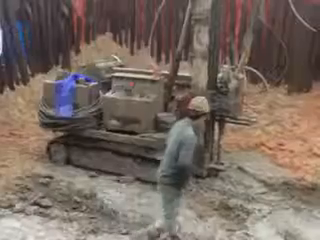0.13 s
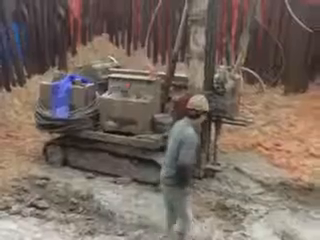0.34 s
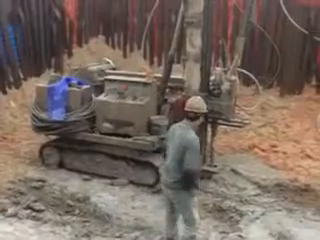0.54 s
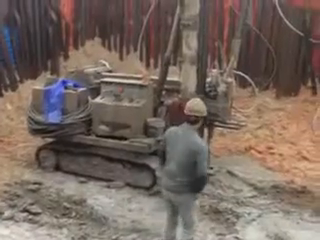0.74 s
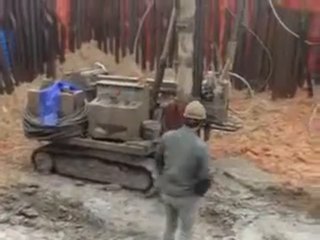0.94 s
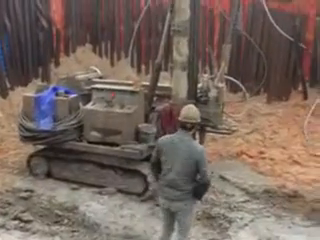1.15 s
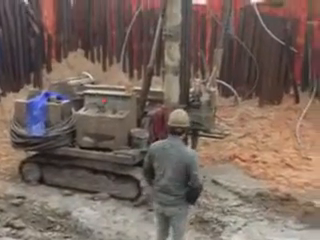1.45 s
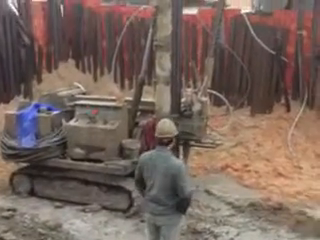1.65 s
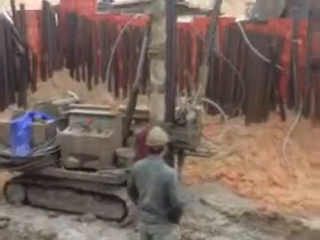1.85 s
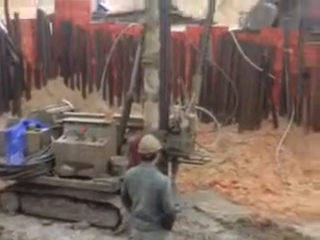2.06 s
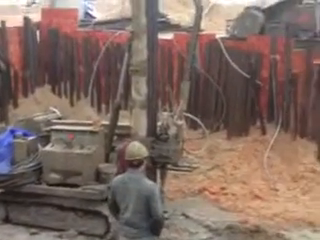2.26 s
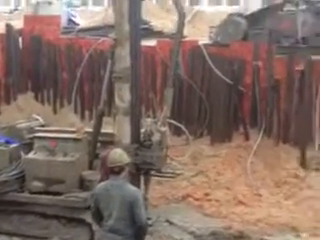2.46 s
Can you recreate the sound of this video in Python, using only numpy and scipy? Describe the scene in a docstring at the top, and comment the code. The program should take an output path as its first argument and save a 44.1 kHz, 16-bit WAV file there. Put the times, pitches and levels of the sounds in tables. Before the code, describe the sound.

After a brief instant of silence, loud drilling rig noise starts abruptly and holds level to the end: rough midrange roar, ringing panels, whining gears, pump tones and chattering metal, in mono with no extreme treble.

```python
"""Drilling rig in a piled pit

A tracked drilling rig runs steadily in a pit lined with steel piles, picked up by one small mono microphone.
Engine, cooling air and hydraulics make a dense roar of coloured noise, and noise rings in panels and pipes.
A gear mesh whines with shaft sidebands, a pump adds a thin series of tones and a low hum throbs.
Behind them loose metal rattles as short rings at random moments, and a few faint steady tones hold on."""
import sys
import numpy as np
from scipy import signal
from scipy.fft import rfft, irfft, next_fast_len
from scipy.io import wavfile
from scipy.ndimage import uniform_filter1d

SR = 44100
rng = np.random.default_rng(int(sys.argv[2]) if len(sys.argv) > 2 else 0)


def transcribe(signal):
    """Save signal, clipped to [-1, 1], as a 16-bit WAV file at the path in sys.argv[1]."""
    frames = np.atleast_2d(signal).T
    limited = np.clip(frames, -1, 1)
    pcm = np.round(limited * 32767).astype(np.int16)
    wavfile.write(sys.argv[1], SR, pcm)


N = 115542
TIME = np.arange(N) / SR


def amp(db):
    """Decibels to gain."""
    return 10 ** (np.asarray(db) / 20)


def rms_one(x):
    """Scale to rms 1."""
    return x / np.sqrt(np.mean(x ** 2) + 1e-20)


def in_time(rows):
    """Columns of a table, after its first in seconds, as curves in time."""
    s, *columns = np.transpose(rows)
    return [np.interp(TIME, s, c) for c in columns]


def drift(rate_hz):
    """Slow random wandering of spread 1: noise low-passed twice near rate_hz."""
    step = 40   # samples between computed points
    r = np.exp(-2 * np.pi * rate_hz * step / SR)
    settle = 2000   # points dropped while the filter settles
    noise = rng.standard_normal(N // step + 2 + settle)
    slow = signal.lfilter([1], [1, -2 * r, r * r], noise)[settle:]
    return np.interp(np.arange(N) / step, np.arange(len(slow)), rms_one(slow))


def tone(hz, level_db, waver=1):
    """A sine whose pitch and rms level waver a little about the given values."""
    pitch_hz = hz + waver * 0.68 * drift(4.3)
    phase = 2 * np.pi * (np.cumsum(pitch_hz) / SR + rng.random())
    wavering_db = level_db + waver * 1.0 * drift(4)
    return np.sqrt(2) * amp(wavering_db) * np.sin(phase)


def ringing(hz, width_hz):
    """Noise through the same two-pole resonance twice, for dark valleys beside the peak; rms 1."""
    r = np.exp(-np.pi * width_hz / SR)
    zeros, poles = [1, 0, -1], [1, -2 * r * np.cos(2 * np.pi * hz / SR), r * r]
    once = signal.lfilter(zeros, poles, rng.standard_normal(N))
    return rms_one(signal.lfilter(zeros, poles, once))


# overall course of the roar, before ROAR_DB: start_s [s], level_db [dB]
ROAR_LEVEL = [(0.16, -31), (0.17, -29), (0.47, -28.5), (0.53, -31), (0.57, -28), (1.51, -28.5),
              (1.54, -26.5), (1.6, -32.5), (1.62, -27.5), (2.6, -28.5)]
# relative colour of the roar between the resonances: pitch_hz [Hz], level_db [dB per Hz]
ROAR_COLOUR = [(18, -80), (30, -56), (74, -36), (151, -5.5), (322, -5.5), (367, -4.5), (501, -7.5),
               (668, -1.5), (872, -8.5), (1520, -11), (2020, -9), (2820, -4.5), (3600, -15), (6000, -25.5),
               (7800, -47.5), (13200, -120)]
# top-end colour of the roar, a slight lift at 6.3 to 7.1 kHz, then a steep drop: pitch_hz [Hz], gain_db [dB]
TOP_COLOUR = [(5500, -5), (6300, -1.5), (6800, -1.5), (7100, -1.5), (7400, -13.5)]
# rattling band and treble grit against the rest of the roar: start_s [s], rattle_db [dB], grit_db [dB]
BRIGHT = [(.15, -0.5, 5), (.4, -1.5, 4.5), (.65, 0.5, 3.5), (.85, 0, 1), (1.0, -2, 1), (1.2, -1, 2),
          (1.5, -2.5, 1), (1.8, -2, 2), (2.05, -0.5, 3), (2.3, -2, 1), (2.62, -1.5, 2.5)]
ROAR_DB = -3.5   # added to the whole course
PATCHY_DB, FLICKER_DB = 1.0, 0.72   # spread of each band's slower and faster unsteadiness
THROB_HZ, THROB_DEPTH = 22, 0.061   # engine cycle pulsing the roar's treble


def roar():
    """Engine, air and hydraulics: noise in overlapping half-octave bands, each flickering on its own."""
    size = next_fast_len(N)
    octave = np.log2(np.arange(size // 2 + 1) * SR / size + 1)   # log2 of the pitch in Hz
    colour_db = 0
    for curve in [ROAR_COLOUR, TOP_COLOUR]:
        hz, db = np.transpose(curve)
        colour_db = colour_db + np.interp(octave, np.log2(hz), db)
    noise = rfft(rng.standard_normal(size)) * amp(colour_db)
    throb = THROB_DEPTH * np.sin(2 * np.pi * np.cumsum(THROB_HZ + drift(2)) / SR)
    rattle_db, grit_db = in_time(BRIGHT)
    out = 0
    for centre in np.arange(4, 14, .5):
        band = irfft(noise * np.clip(1 - 2 * abs(octave - centre), 0, 1), size)[:N]
        # grit in bands centred from 4096 Hz up, rattling band in those at 2048 and 2896 Hz
        bright_db = grit_db if centre >= 12 else rattle_db * (centre >= 11)
        unsteady_db = PATCHY_DB * drift(6.8) + FLICKER_DB * drift(25)
        pulse = 1 + throb * (centre > 10)   # bands centred above 1024 Hz
        out = out + band * amp(bright_db + unsteady_db) * pulse
    level_db, = in_time(ROAR_LEVEL)
    return amp(level_db + ROAR_DB) * rms_one(out)


# panel and pipe resonances: pitch_hz [Hz]
PANEL_HZ = [168, 463, 558, 645, 741, 830, 1655, 1810, 2460, 2620, 2685, 2757, 2898, 3045, 3230, 3900, 4700,
            5640]
# one row per resonance: width_hz [Hz, each filter pass], level_db [dB rms, before swells and surges]
PANELS = [(30.4, -48.5), (12, -49.5), (25.4, -49), (44.7, -44), (29.3, -41.5), (103, -49.5), (26, -50.5),
          (40, -49.5), (40, -50), (16, -59.5), (27, -50.5), (31, -46.5), (30, -49), (85, -47.5), (80, -52),
          (100, -51.5), (200, -60.5), (220, -57)]
# surges of the engine-body resonances between 600 and 800 Hz: start_s [s], gain_db [dB]
SURGE = [(.15, -1), (.4, -1.5), (.58, -1.5), (.72, 4), (.9, -4), (1.0, -5), (1.15, 6.5), (1.3, -2.5),
         (1.55, 0.5), (1.75, -1), (1.9, 1.5), (2.1, 0.5), (2.3, -1.5), (2.62, 6)]


def panels():
    """Broadband shaking rings each panel and pipe, which swells and sinks on its own."""
    surge_db, = in_time(SURGE)
    out = 0
    for hz, (width_hz, level_db) in zip(PANEL_HZ, PANELS):
        swell_db = 1.0 * drift(4.0)
        body_db = surge_db * (600 < hz < 800)
        out = out + amp(level_db + body_db + swell_db) * ringing(hz, width_hz)
    return out


# swells of the boom: start_s [s], level_db [dB rms]
BOOM = [(0.16, -47), (0.23, -33.5), (0.29, -44), (0.34, -29), (0.41, -48), (0.45, -34), (0.49, -48.5),
        (0.83, -37.5), (1.02, -45), (1.06, -32.5), (1.11, -43.5), (1.46, -45.5), (1.52, -33.5), (1.72, -47),
        (2.39, -41), (2.43, -56), (2.51, -35.5), (2.6, -53)]


def boom():
    """A resonance near 280 Hz rung by noise, its own fluctuation evened out so it follows the swells."""
    ring = ringing(278, width_hz=23)
    power = uniform_filter1d(ring ** 2, size=2000)
    even = ring / np.sqrt(power + 0.15)
    level_db, = in_time(BOOM)
    return amp(level_db) * rms_one(even)


# gear whine: start_s [s], mesh_db [dB rms], third_lower_sideband_db [dB rms]
WHINE = [(.15, -41, -66.5), (.6, -39.5, -57), (1.2, -39, -53), (1.6, -41.5, -53), (2.0, -40.5, -52),
         (2.3, -50.5, -41.5), (2.62, -43, -45.5)]
# the other sidebands, distance from the mesh tone: order [shaft turns]
SIDEBAND_ORDERS = [-4, -2, 1, 3, 4, 7]
# one per sideband order: level_db [dB rms]
SIDEBAND_DB = [-57, -54, -53, -55, -55, -56]
MESH_HZ, SHAFT_HZ = 2072.6, 48.6


def gearbox():
    """Meshing teeth whine, with sidebands spaced by the shaft speed."""
    mesh_db, third_db = in_time(WHINE)
    mesh = tone(MESH_HZ, mesh_db, waver=.3)
    third = tone(MESH_HZ - 3 * SHAFT_HZ, third_db, waver=.3)
    others = sum(tone(MESH_HZ + k * SHAFT_HZ, db) for k, db in zip(SIDEBAND_ORDERS, SIDEBAND_DB))
    return mesh + third + others


# swells of the throbbing hum: start_s [s], level_db [dB rms]
HUM = [(0.16, -45), (0.33, -33.5), (0.38, -48.5), (0.46, -30.5), (0.57, -51), (0.63, -38), (0.66, -50),
       (0.72, -36.5), (0.8, -45), (0.85, -51), (0.92, -31), (1.0, -45), (1.13, -36.5), (1.17, -52.5),
       (1.23, -37), (1.29, -58), (1.33, -36), (1.38, -45), (1.56, -33), (1.61, -49), (1.67, -37),
       (1.71, -36), (1.76, -53.5), (1.86, -38), (2.01, -46), (2.15, -33.5), (2.24, -46), (2.31, -34),
       (2.43, -42.5), (2.46, -34.5), (2.57, -39.5), (2.6, -43)]


def hum():
    """A single low tone whose level throbs unevenly."""
    level_db, = in_time(HUM)
    return tone(371.5, level_db)


# pump harmonics: order [multiple of the pump's base pitch]
PUMP_ORDERS = [2, 3, 4]
# one per harmonic: level_db [dB rms]
PUMP_DB = [-45.5, -42.5, -58.5]
PUMP_HZ = 224.8


def pump():
    """A thin series of tones at whole multiples of the pump's base pitch."""
    return sum(tone(k * PUMP_HZ, db) for k, db in zip(PUMP_ORDERS, PUMP_DB))


RATTLES_PER_S, RATTLE_T60_S, RATTLE_DB = 350, .05, -41   # level is rms
RATTLE_CENTRE_HZ, RATTLE_TILT_DB = 2600, 16   # loss per octave off the centre


def rattle():
    """Loose metal parts knock at random and ring briefly at scattered pitches."""
    parts = 30
    strength = amp(3 * np.minimum(rng.exponential(1, N), 2))   # 0 to 6 dB
    knocks = (rng.random(N) < RATTLES_PER_S / SR) * strength
    dealt = rng.integers(0, parts, N)   # which part each knock strikes
    r = amp(-60 / (RATTLE_T60_S * SR))
    out = 0
    for k, hz in enumerate(np.geomspace(1500, 5000, parts)):
        poles = [1, -2 * r * np.cos(2 * np.pi * hz / SR), r * r]
        ring = signal.lfilter([1, 0, -1], poles, knocks * (dealt == k) + 1e-18)
        loss_db = RATTLE_TILT_DB * abs(np.log2(hz / RATTLE_CENTRE_HZ))
        out = out + amp(-loss_db) * ring
    return amp(RATTLE_DB) * rms_one(out)


# faint separate steady tones: pitch_hz [Hz]
TONES_HZ = [125.2, 328, 1095.5, 1714.6, 2238.5]
# one per tone: level_db [dB rms]
TONES_DB = [-62, -53, -55, -55, -54]


def faint_tones():
    """Separate sines, each wavering slightly in pitch and strength."""
    return sum(tone(hz, db) for hz, db in zip(TONES_HZ, TONES_DB))


def scene():
    """All sources add at one microphone, the same in both channels."""
    rig = roar() + panels() + boom() + gearbox() + hum() + pump() + rattle() + faint_tones()
    return np.array([rig, rig])


START_S, CUTOFF_HZ = .1507, 7380


def record(dry):
    """Silence until the recorder starts, then a steep low-pass cuts the top."""
    started = dry * (TIME > START_S)
    low_pass = signal.ellip(12, .3, 55, CUTOFF_HZ, fs=SR, output="sos")   # ripple, stopband in dB
    return signal.sosfilt(low_pass, started)


dry = scene()
out = record(dry)
transcribe(out)
```